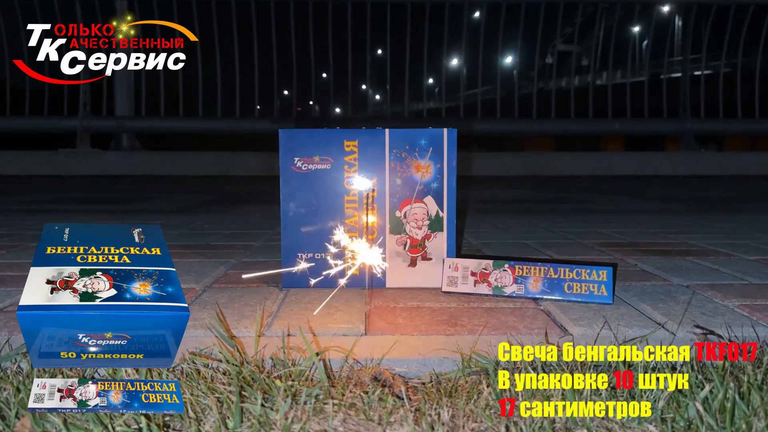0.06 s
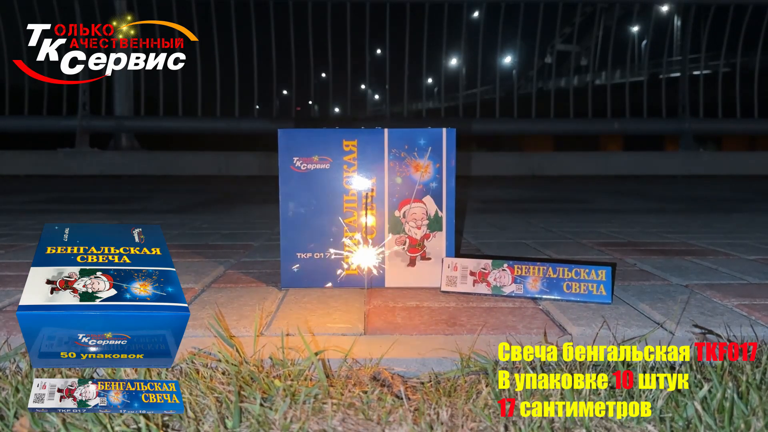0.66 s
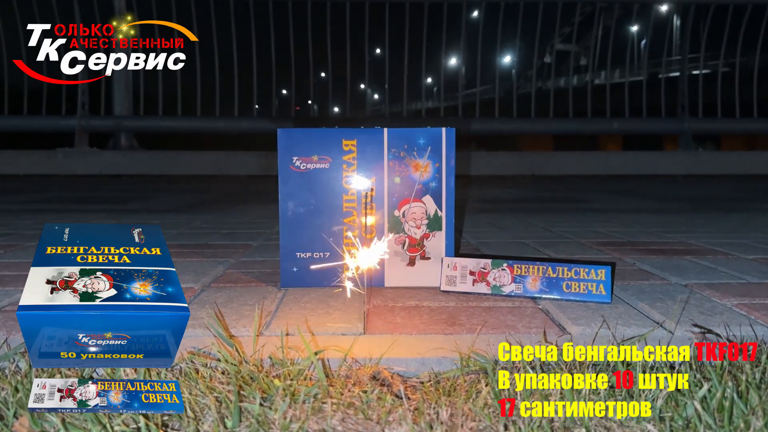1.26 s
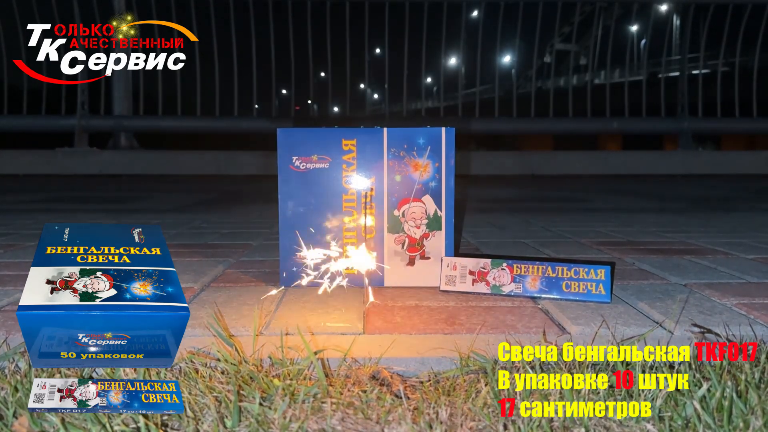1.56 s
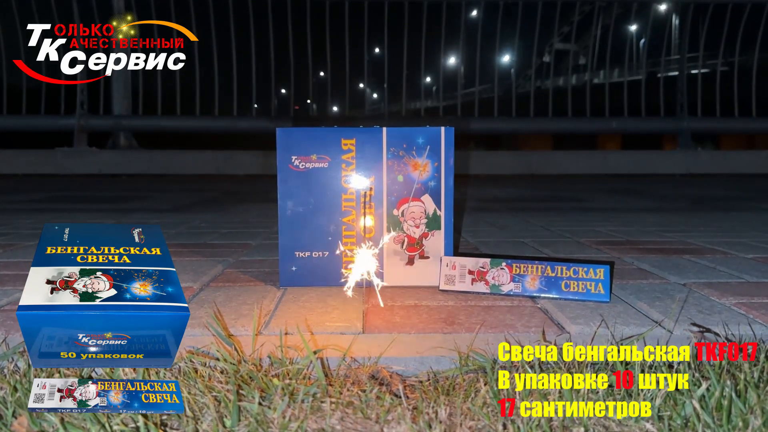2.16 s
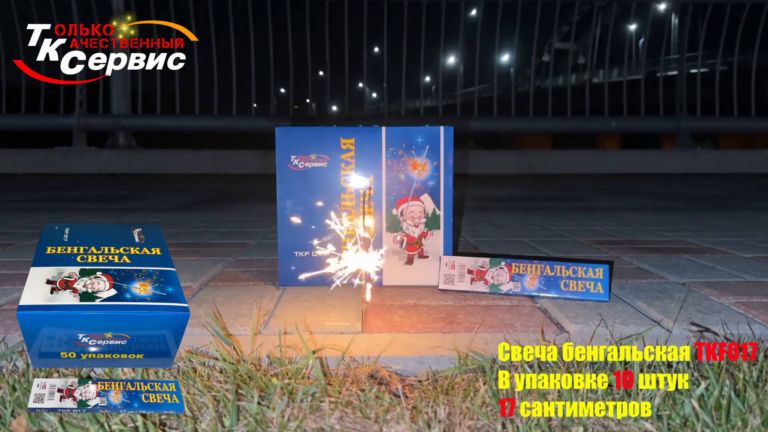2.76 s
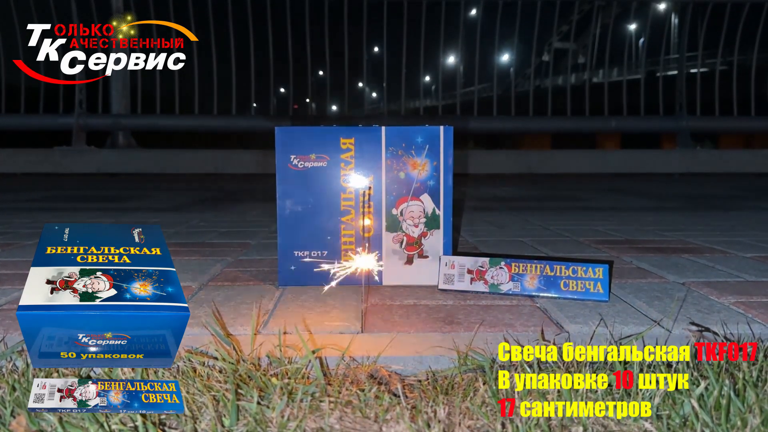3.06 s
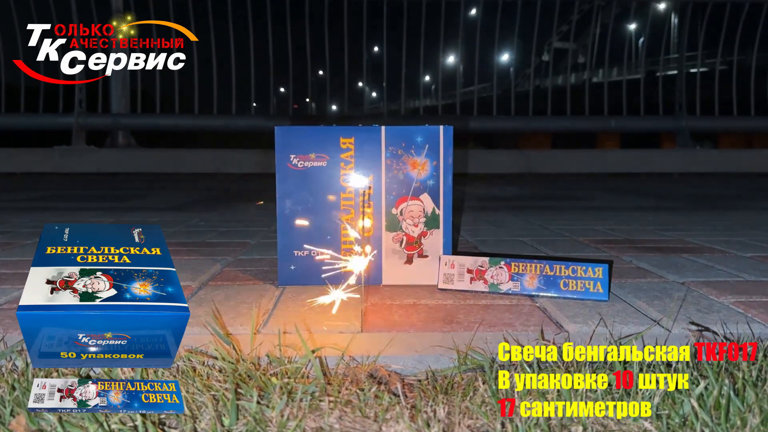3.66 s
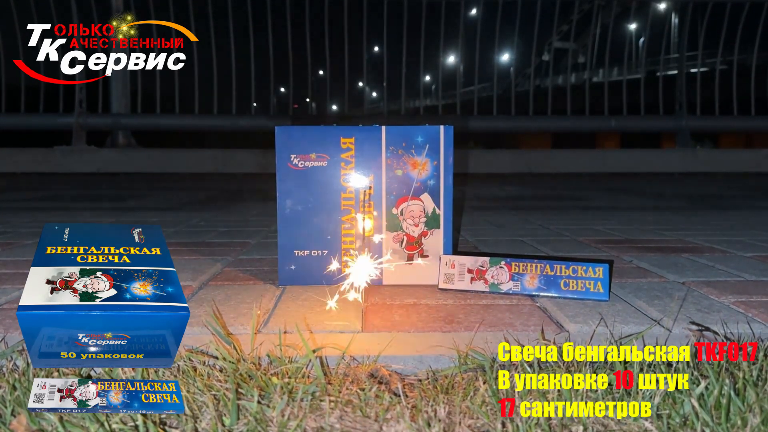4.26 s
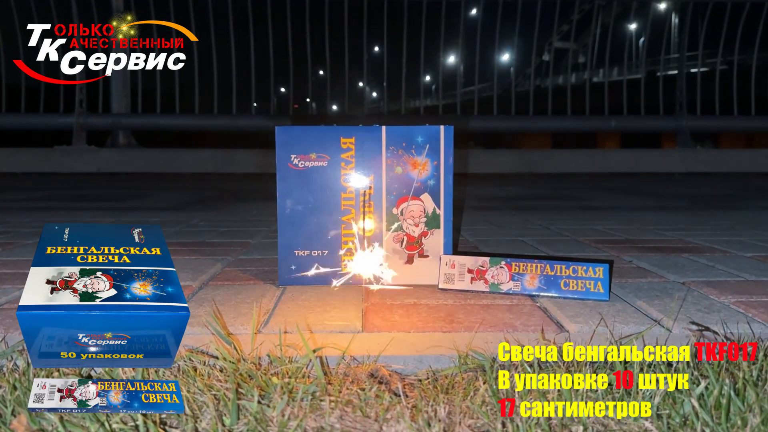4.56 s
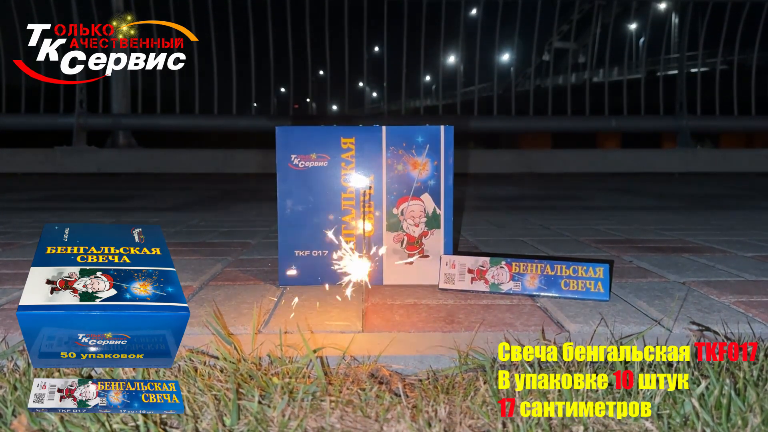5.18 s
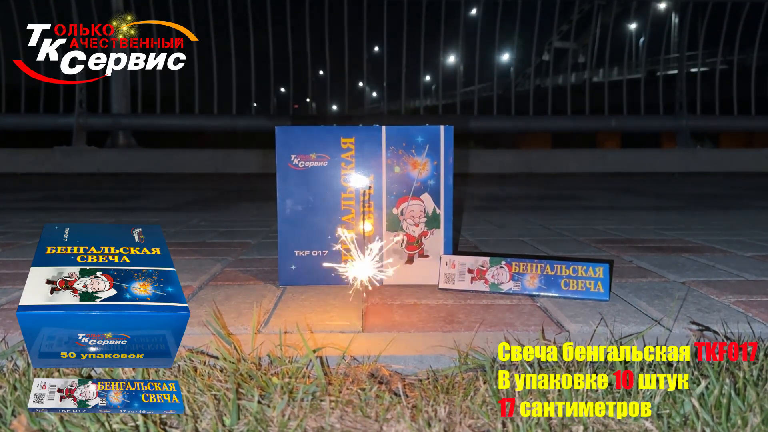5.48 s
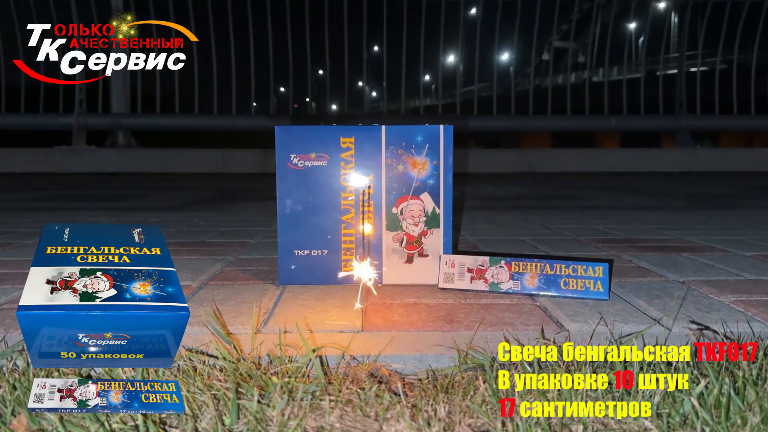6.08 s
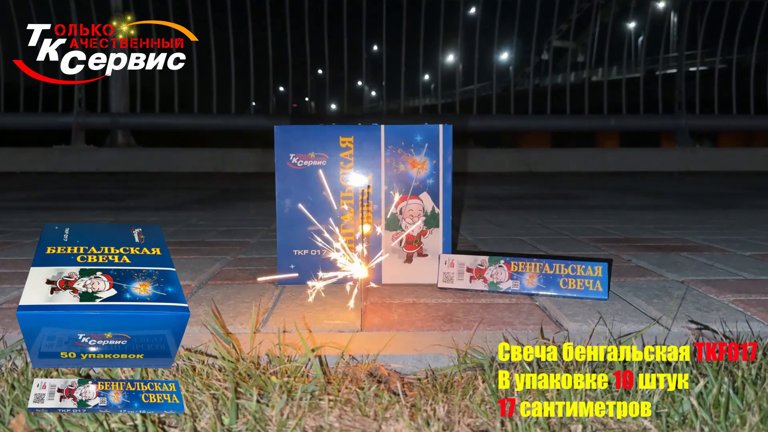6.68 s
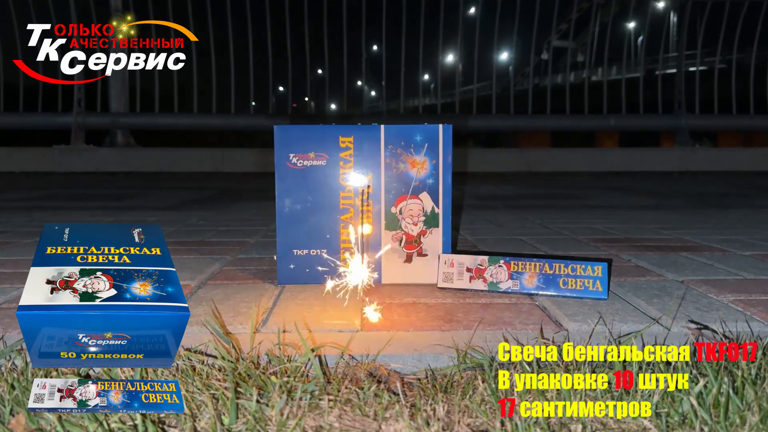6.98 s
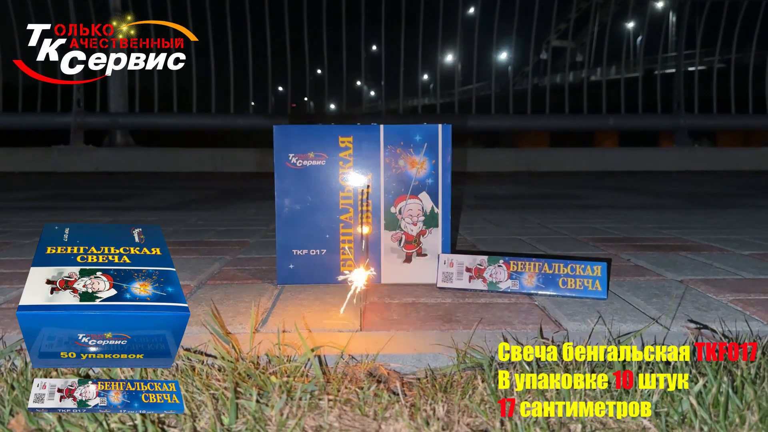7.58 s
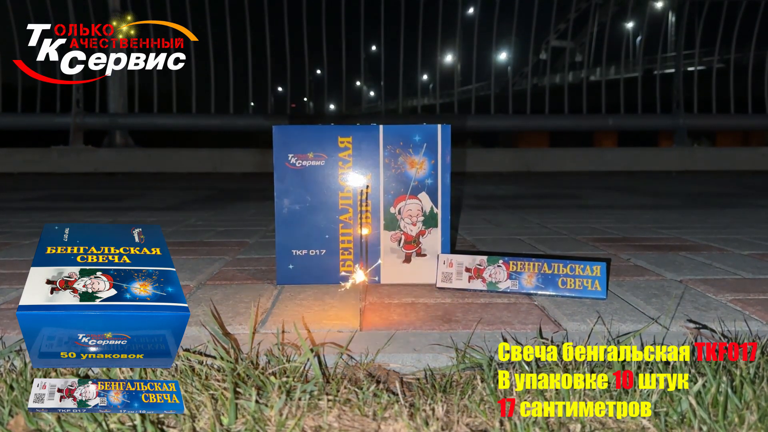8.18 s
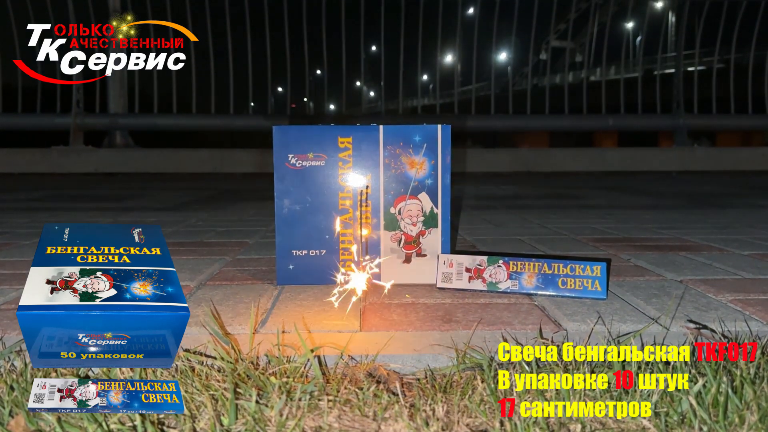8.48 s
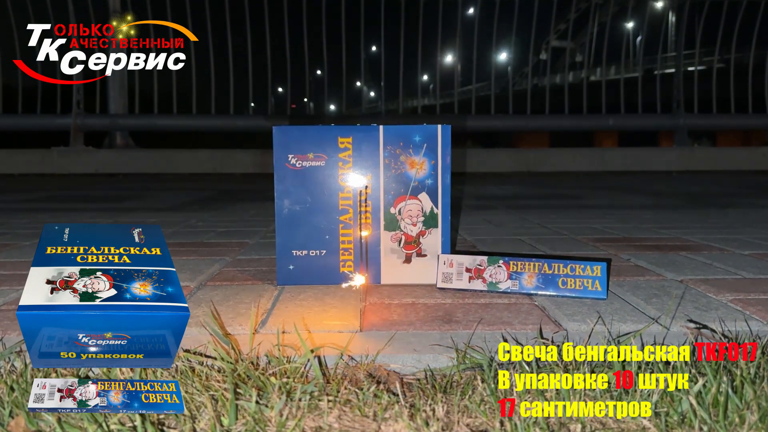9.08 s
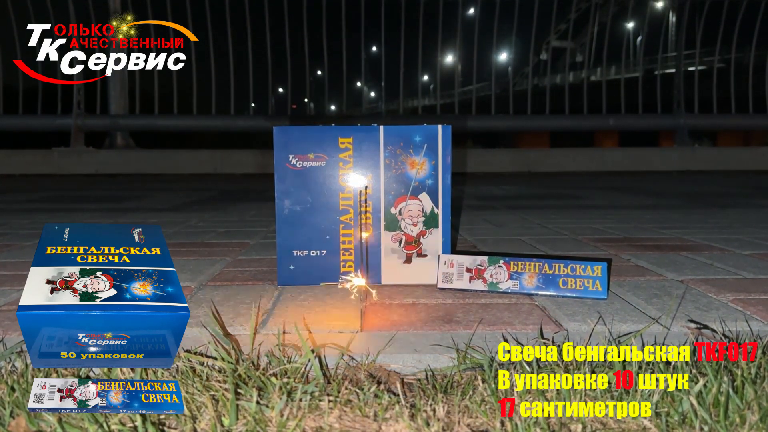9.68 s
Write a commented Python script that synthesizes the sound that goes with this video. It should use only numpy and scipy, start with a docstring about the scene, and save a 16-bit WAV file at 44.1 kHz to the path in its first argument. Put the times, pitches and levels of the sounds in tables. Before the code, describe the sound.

The low rumble of far-off traffic and wavering engine hum fill an open outdoor space. Close to the microphone, a sparkler hisses and spits throughout, surging in short spurts with scattered sharp snaps. The engine drone fades after the middle, where a few soft knocks sound in the background. The sparkler slowly grows thinner and more sputtering, while a distant exhaust swells near the end.

```python
"""Sparkler on paving at night

Outdoors, close to a camera's two microphone ports, a sparkler's flame front fizzes in uneven flares.
Flying metal grains burst in short spurts and a few sharp pops, over the soft rush of hot gas.
Far behind lie the rumble and tyre roar of a town, droning engines and a few dull bumps."""
import sys
import numpy as np
from scipy.fft import rfft, irfft, next_fast_len
from scipy.io import wavfile
from scipy.ndimage import map_coordinates

SR = 44100
rng = np.random.default_rng(int(sys.argv[2]) if len(sys.argv) > 2 else 0)


def log_audio(samples):
    """Write samples as a 16-bit WAV file to the path given in sys.argv[1]."""
    # one column per channel
    frames = np.atleast_2d(samples).T
    # limit to full scale, then quantise
    limited = np.clip(frames, -1, 1)
    pcm = np.round(limited * 32767).astype(np.int16)
    wavfile.write(sys.argv[1], SR, pcm)


N = 433944

# How far and close sounds reach the two microphone ports.
# Each row: frequency in Hz, left minus right in dB, left lead in radians, coherence from 0 to 1.
FAR_PORTS = [(57.6, 0, -0.0, 0.95), (143, -3, 0.47, 0.95), (219, -2.5, 1.87, 0.49), (343, 4, 0.3, 0.21),
             (464, -1.5, 2.0, 0.73), (715, 5, 2.5, 0.094), (1290, -1, 0.5, 0.12), (1590, 2.5, 2.5, 0.86)]
NEAR_PORTS = [(2230, 0, 0.31, 0.69), (3430, -2, 0.5, 0.4), (4200, -3, 2, 0.66), (5070, 5, 0.66, 0.63),
              (5540, -9, 3, 0.93), (6240, -1, 0.46, 0.5), (6880, -4.5, -3, 0.36), (7400, -2, -3, 0.73),
              (7900, 4.5, -3, 0.7), (8800, 2.5, -4, 0.78), (10240, -0.5, -3.5, 0.6), (11950, 0, -4.5, 0.92),
              (15400, 0, -5, 0.9)]

# Background spectra: town rumble, far tyres, nearer tyres, a ringing engine casing, a bump.
# Each row: frequency in Hz, relative density in dB.
RUMBLE_COLOUR = [(15, -39), (24, -34), (35, -16.5), (52, -4.5), (66, 0), (100, -8.5), (170, -10.5),
                 (260, -23), (600, -64.5)]
ROAR_COLOUR = [(80, -29), (180, 6), (280, -2.5), (350, -3), (430, -1), (560, -6), (780, -7.5), (1300, -15),
               (1650, -21.5), (2000, -28.5), (3000, -40), (5000, -47.5), (15000, -51)]
TYRE_COLOUR = [(400, -25), (750, -2), (1200, -4), (1600, 0), (2000, -17), (4000, -50)]
CASING_COLOUR = [(600, -52), (860, -14), (970, 6), (1100, -18), (1500, -10), (2200, -48)]
THUD_COLOUR = [(40, -15), (120, 1), (330, 0), (450, -16), (680, -11), (1200, -26), (3000, -45)]
# Tyre hiss of nearer cars. Each row: loudest moment and half-width in seconds, level in dB.
CAR_PASSES = [(.8, .7, -68.5), (9.7, 0.49, -60.5)]
# A distant engine gathers speed. Each row: time in seconds, firing rate in Hz.
FIRING_RATE = [(0, 62.6), (1.0, 70.82), (2.5, 72.74), (4.55, 75.3), (4.9, 75.08), (5.8, 73.6)]
# Its drone at the microphone. Each row: time in seconds, level in dB.
DRONE_LEVEL = [(0, -54.5), (1.35, -44), (1.85, -49), (2.4, -46.5), (3, -50.5), (3.7, -44.5), (4.1, -47),
               (4.55, -40), (5.25, -50), (6.3, -76)]
# Its low harmonics. Each row: multiple of the firing rate, relative level in dB.
DRONE_ORDERS = [(1, -10), (2, 1.5), (3, -12), (5, -21), (6, -12)]
# The resonance that makes its upper harmonics whine. Each row: frequency in Hz, relative gain in dB.
WHINE_RESONANCE = [(680, -9), (755, -1.5), (830, -5), (905, 1), (985, 1.5), (1055, -4), (1140, -15)]
# Heavy exhausts, and one vehicle braking as it passes.
# Each row: loudest moment and half-width in seconds, pitch in Hz, glide in Hz a second, level in dB.
EXHAUST_PASSES = [(0, 0.5, 67, 1, -59), (2.1, 0.63, 69, -7.5, -43), (7.6, .6, 76, 4, -51.5),
                  (9.7, 0.81, 80.6, 1.5, -44.5)]
BRAKING_PASS = (3, 2.5, 158, -9, -49)
# Dull bumps in the background. Each row: start in seconds, relative level in dB.
BUMPS = [(5.587, -35), (5.753, -35.5), (6, -29.5), (6.009, -44), (6.036, -40), (6.05, -34.5), (6.085, -36),
         (6.164, -35), (8.835, -29.5)]

# Close spectra: rushing gas, fine fizz, the lower crack of coarse grains.
# Each row: frequency in Hz, relative density in dB.
FLAME_COLOUR = [(600, -15), (1500, -1), (2300, 4.5), (3200, -6), (4500, -23), (8000, -35)]
FIZZ_COLOUR = [(300, -22), (1200, 3.5), (2400, 0), (3000, -2.5), (4000, -2.5), (5300, -6), (6200, -3),
               (7200, -4), (8300, -0.5), (10400, -5), (11400, 1), (12200, 2.5), (13500, -1.5), (15500, 0.5)]
CRACK_COLOUR = [(300, -16), (1200, 13.5), (3000, 6), (6000, -7.5), (15000, -8)]
# The gas rush, fuller as the stick burns down. Each row: time in seconds, level in dB.
FLAME_LEVEL = [(0, -86), (5, -70.5), (9.84, -70.5)]
# The steady burn, sinking as the stick is used up. Each row: time in seconds, relative level in dB.
BURN_LEVEL = [(0.0, -65), (0.6, -61.5), (1.02, -65.7), (1.35, -62.5), (2.5, -65.5), (4.9, -65.5),
              (5.85, -70.5), (7.3, -68.5), (8.15, -74), (9.2, -72), (9.6, -84), (9.84, -69)]
# Fresh patches of coating catch. Each row: start and hold in seconds, relative level in dB.
FLARES = [(0.017, 0.046, -64), (0.106, 0.13, -62), (0.296, 0.067, -61.5), (0.659, 0.014, -60),
          (0.8, 0.13, -59.5), (1.159, 0.024, -63.5), (1.49, 0.112, -60), (1.623, 0.33, -65.0),
          (2.068, 0.34, -66), (2.573, 0.35, -65), (2.7, 0.082, -59.5), (3.118, 0.38, -67.5),
          (3.573, 0.098, -61), (3.71, 0.266, -69), (4.05, 0.64, -64.5), (4.996, 0.29, -63),
          (5.304, 0.2, -68.0), (5.521, 0.18, -60.5), (5.932, 0.319, -65.5), (6.142, 0.049, -62.5),
          (6.341, 0.161, -71), (6.526, 0.281, -64.0), (6.75, 0.028, -60), (6.94, 0.244, -62),
          (7.272, 0.057, -63.5), (7.416, 0.032, -63.5), (7.524, 0.025, -59.0), (7.64, 0.051, -67),
          (7.708, 0.061, -63), (8.003, 0.024, -63), (8.094, 0.025, -67.5), (8.25, 0.036, -59.5),
          (8.307, 0.04, -68), (8.449, 0.19, -62.5), (8.665, 0.19, -66), (9.046, 0.23, -70.5),
          (9.34, 0.19, -71.5), (9.735, 0.061, -70.5)]
# The loudest sparks. Each row: time in seconds, relative level in dB, low crack against the treble
# in dB, seconds for the sizzle to fall 60 dB.
POPS = [(.187, -35, -10, 0.062), (.838, -36, -10, 0.047), (.8736, -27.5, -9, .018), (1.193, -38, -11, .015),
        (1.589, -34, -10, .02), (1.945, -34.5, -8, .015), (2.4665, -36.5, -7, .02), (2.729, -33, -3, 0.018),
        (3.043, -39.5, -6, .03), (3.0502, -26, -11, .02), (3.4795, -36.5, 2, .018), (3.6065, -31, -8, .033),
        (3.6177, -35, -11, .013), (5.647, -35.5, -2, 0.031), (7.055, -37, -1, 0.028),
        (7.0946, -25, -13, 0.013), (7.2817, -37, -16, 0.023), (7.924, -40, -17, .018),
        (8.0018, -33.5, -5, .03), (8.274, -39.5, -2, .03), (8.639, -38, -4, .018), (8.828, -40, -6, 0.017),
        (8.86, -36, -5.5, .015)]
# The paving colours the fizz as the flame travels down the stick.
# Each row: frequency in Hz, gain in dB with the flame at the top, gain in dB with it lower down.
TRAVEL_COLOUR = [(2600, -.5, 1), (4000, 1.5, 0), (5500, 1.5, -0.5), (7000, 1.5, -.5), (8250, -2.5, 1.5),
                 (9200, -1, 3.5), (11000, 0.5, -1)]
# Reflections off the paving and a carton behind the sparkler. Each row: delay in seconds, gain.
ECHOES = [(.00097, 0.12), (.0046, 0.13)]

FFT_SIZE = next_fast_len(N + 8192)
BIN_HZ = np.fft.rfftfreq(FFT_SIZE, 1 / SR)
TIME = np.arange(N) / SR
SIDE = np.array([[.5], [-.5]])  # left and right each take half of what separates the ports


def amp(db):
    """Decibels to gain."""
    return 10 ** (np.asarray(db) / 20)


def unit(x):
    """Scale to rms 1."""
    return x / np.sqrt(np.mean(x ** 2) + 1e-20)


def along(rows, hz):
    """Each column of a frequency table, read on a log axis."""
    row_hz, *columns = np.transpose(rows)
    return [np.interp(np.log(hz + 1), np.log(row_hz), column) for column in columns]


def curve(rows):
    """A time table, read at every sample."""
    return np.interp(TIME, *np.transpose(rows))


def wobble(per_second):
    """A smooth curve through evenly spaced random knots."""
    knots = rng.standard_normal(int(N * per_second / SR) + 4)
    return map_coordinates(knots, [TIME * per_second], mode="nearest")


def swell(peak_s, width_s, db):
    """The bell-shaped envelope of something passing the microphone."""
    return amp(db) * np.exp(-.5 * ((TIME - peak_s) / width_s) ** 2)


def add(track, start_s, sound):
    """Mix a sound into a track."""
    part = track[max(round(start_s * SR), 0):][:len(sound)]
    part += sound[:len(part)]


def rush(envelope, spectrum, ports):
    """Turbulent noise that follows the envelope, coloured and picked up at both ports."""
    direct, *scattered = rfft(rng.standard_normal((3, N)) * envelope, FFT_SIZE)
    balance_db, lead, coherence = along(ports, BIN_HZ)
    pair = np.sqrt(coherence) * direct + np.sqrt(1 - coherence) * np.array(scattered)
    colour = unit(amp(along(spectrum, BIN_HZ)[0]))
    pickup = amp(SIDE * balance_db) * np.exp(1j * SIDE * lead)
    return irfft(pair * colour * pickup, FFT_SIZE)[:, :N]


def town():
    """Far traffic rumbles and roars, slowly thinning out; nearer tyres hiss past."""
    rumble_db = -41.5 - 0.18 * TIME + 0.83 * wobble(6)
    rumble = rush(amp(rumble_db), RUMBLE_COLOUR, FAR_PORTS)
    roar_db = -45 - 0.2528 * TIME + 0.35 * wobble(5.7)
    roar = rush(amp(roar_db), ROAR_COLOUR, FAR_PORTS)
    hiss = rush(sum(swell(*car) for car in CAR_PASSES), TYRE_COLOUR, FAR_PORTS)
    return rumble + roar + hiss


def harmonics(rate_hz, orders, flutter_db, smear_rad):
    """Engine orders, together of rms 1; reflections on the long path make each one waver."""
    turns = np.cumsum(rate_hz) / SR
    tone = np.zeros((2, N))
    for order, db in orders:
        balance_db, lead, _ = along(FAR_PORTS, order * rate_hz.mean())
        phase = 2 * np.pi * order * turns + smear_rad * wobble(9)
        level = amp(db + flutter_db * wobble(7))
        tone += level * amp(SIDE * balance_db) * np.sin(phase + SIDE * lead)
    return unit(tone)


def distant_engine():
    """An engine drones and whines far off; each firing shakes a rasp from its casing."""
    rate_hz, drone_db = curve(FIRING_RATE), curve(DRONE_LEVEL)
    drone = amp(drone_db) * harmonics(rate_hz, DRONE_ORDERS, flutter_db=1.5, smear_rad=0.45)
    whine_db = -59 + 1.15 * (drone_db + 44.5)  # swells a little more than the drone
    whine_orders = [(k, along(WHINE_RESONANCE, k * rate_hz)[0]) for k in range(10, 16)]
    whine = amp(whine_db) * harmonics(rate_hz, whine_orders, flutter_db=2.5, smear_rad=0.64)
    firing = unit(1 + np.cos(2 * np.pi * np.cumsum(rate_hz) / SR))
    rasp = rush(amp(whine_db - 4.5) * firing, CASING_COLOUR, FAR_PORTS)
    return drone + whine + rasp


def passing(vehicle, orders, flutter_db, smear_rad):
    """A vehicle's tone swells and fades while its pitch glides."""
    peak_s, width_s, hz, glide, db = vehicle
    rate_hz = hz + glide * np.clip(TIME - peak_s, -2 * width_s, 2 * width_s)
    return swell(peak_s, width_s, db) * harmonics(rate_hz, orders, flutter_db, smear_rad)


def distant_vehicles():
    """Heavy exhausts boom across town, and a braking vehicle's hum sinks in pitch."""
    booms = sum(passing(vehicle, [(1, 4), (2, -12.5)], flutter_db=2, smear_rad=0.37)
                for vehicle in EXHAUST_PASSES)
    hum = passing(BRAKING_PASS, [(1, 0.013), (1.275, -1)], flutter_db=3, smear_rad=0.48)
    return booms + hum


def bumps(attack_s=0.0017, t60_s=0.13):
    """Soft, quickly damped knocks, well back from the microphone."""
    blows = np.zeros(N)
    t = TIME[:SR // 4]
    for start_s, db in BUMPS:
        add(blows, start_s, amp(db - 1 - 60 * t / t60_s) * (1 - np.exp(-t / attack_s)))
    return rush(blows, THUD_COLOUR, FAR_PORTS)


def flame():
    """Close up, hot gas leaves the burning tip with a soft, fairly steady rush."""
    return rush(amp(curve(FLAME_LEVEL) + 0.96 * wobble(6.8)), FLAME_COLOUR, NEAR_PORTS)


def flame_front(attack_s=0.016, t60_s=0.15, flicker_db=0.7):
    """Strength of the burn: never quite even, with flares that catch, hold and die back."""
    power = amp(curve(BURN_LEVEL)) ** 2
    t = TIME[:SR]
    for start_s, hold_s, db in FLARES:
        catch = np.minimum(t / attack_s, 1)
        flare = catch * amp(db - 60 * np.maximum(t - hold_s, 0) / t60_s)
        add(power, start_s, flare ** 2)
    return np.sqrt(power) * amp(flicker_db * wobble(per_second=28))


def bursts(per_second, life_s, spread_db):
    """Envelope, of rms 1, of grains that flash up at random and die; their powers add."""
    power = np.zeros(N)
    for when, strength, span in rng.random((int(per_second * N / SR), 3)):
        decay_s = life_s * 4 ** (span - .5)
        age = np.arange(int(6 * decay_s * SR) + 2) / (decay_s * SR)
        size_db = -spread_db * np.log(strength + 0.021)  # most are small, a few large
        add(power, when * N / SR, amp(size_db) ** 2 * np.exp(-age) * (1 - np.exp(-8 * age)))
    return unit(np.sqrt(power))


def pops():
    """Large grains explode near the microphone: a snap and a short sizzle."""
    bright, low = np.zeros((2, N))
    t = TIME[:SR // 8]
    snap = amp(-60 * t / .004)
    for time_s, db, crack_db, t60_s in POPS:
        sizzle = amp(-60 * t / t60_s) * (1 - np.exp(-t / 0.00032))
        envelope = amp(db - 8) * (snap + 0.52 * sizzle)
        add(bright, time_s + 0.00089, envelope)
        add(low, time_s + 0.00094, amp(crack_db) * envelope)
    return rush(bright, FIZZ_COLOUR, NEAR_PORTS) + rush(low, CRACK_COLOUR, NEAR_PORTS)


def sparkler():
    """Close up, the flame front hisses; grains spurt, tick and spit, all louder when it flares."""
    burn = flame_front()
    spurts = amp(-0.5) * bursts(per_second=97, life_s=0.0041, spread_db=2.5)
    ticks = amp(-5) * bursts(per_second=240, life_s=0.0002, spread_db=4.6)
    fizz = rush(amp(2.5) * burn * np.sqrt(1 + spurts ** 2 + ticks ** 2), FIZZ_COLOUR, NEAR_PORTS)
    spits = amp(-11.5) * burn * bursts(per_second=92, life_s=0.00088, spread_db=1)
    return fizz + rush(spits, CRACK_COLOUR, NEAR_PORTS)  # coarser grains sound lower


def burning_down(sparks):
    """The colour of the sparks drifts as the flame creeps towards the paving."""
    spectrum = rfft(sparks, FFT_SIZE)
    top, bottom = (irfft(spectrum * amp(db), FFT_SIZE)[:, :N] for db in along(TRAVEL_COLOUR, BIN_HZ))
    return top + (bottom - top) * np.arange(N) / N


def reflected(direct):
    """Nearby surfaces return weak copies that make the hiss slightly hollow."""
    return direct + sum(gain * np.pad(direct, ((0, 0), (round(delay_s * SR), 0)))[:, :N]
                        for delay_s, gain in ECHOES)


def scene():
    """The sparkler close to the microphone, the night-time town far behind."""
    sparks = burning_down(sparkler() + pops())
    foreground = reflected(sparks + flame())
    return foreground + bumps() + town() + distant_engine() + distant_vehicles()


def record(dry, top_hz=15800):
    """The camera keeps nothing above its band limit."""
    return irfft(rfft(dry, FFT_SIZE) * (BIN_HZ < top_hz), FFT_SIZE)[:, :N]


dry = scene()
out = record(dry)
log_audio(out)
```